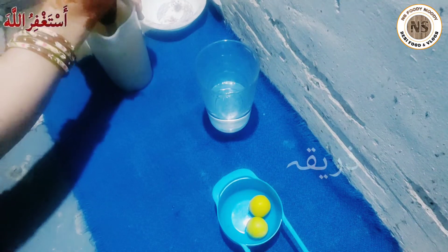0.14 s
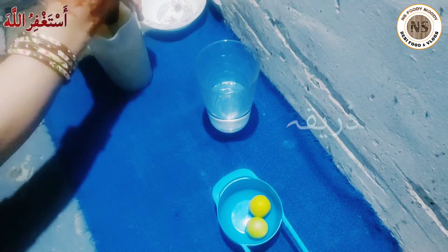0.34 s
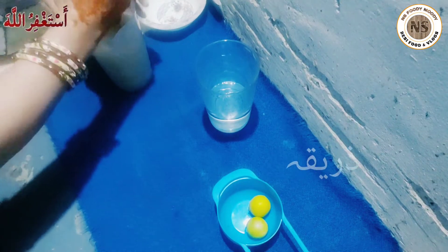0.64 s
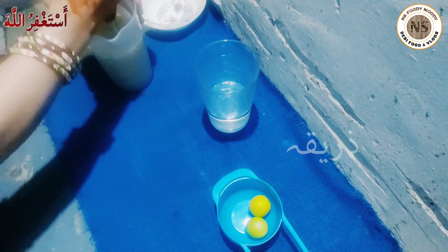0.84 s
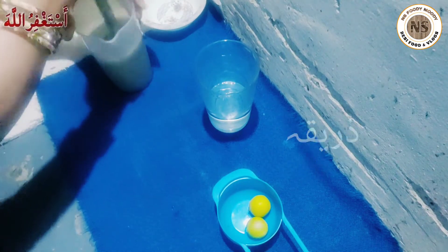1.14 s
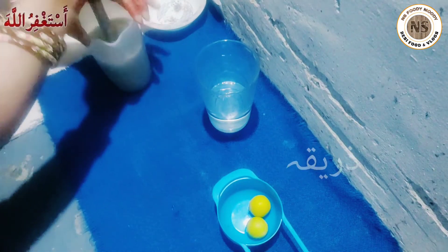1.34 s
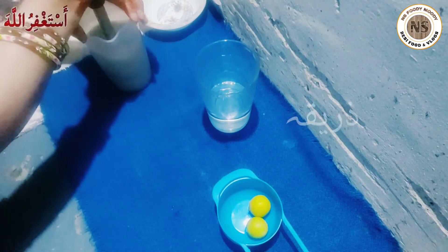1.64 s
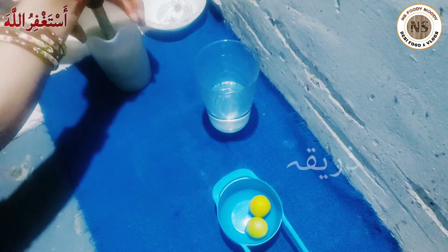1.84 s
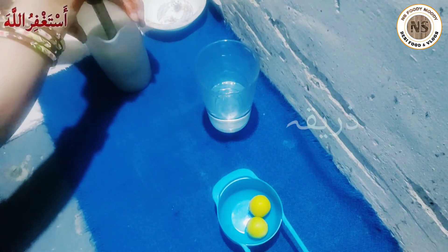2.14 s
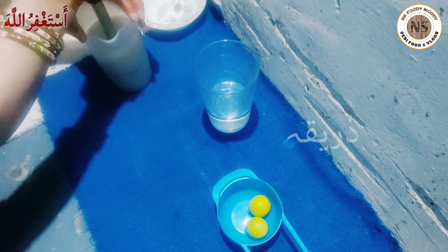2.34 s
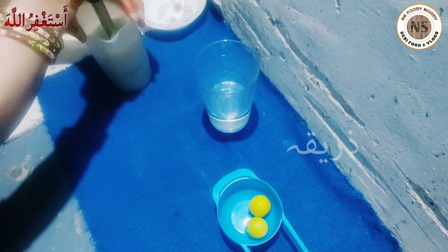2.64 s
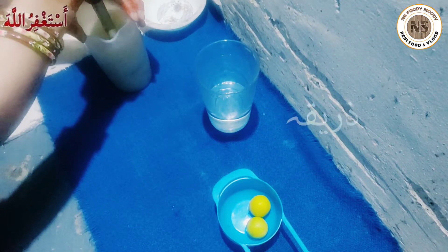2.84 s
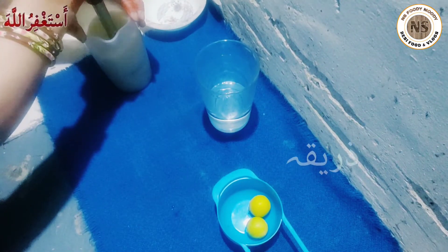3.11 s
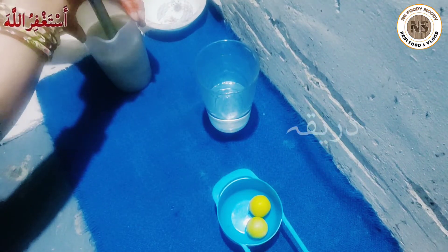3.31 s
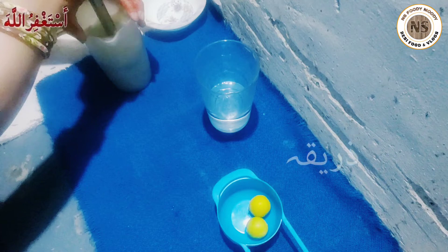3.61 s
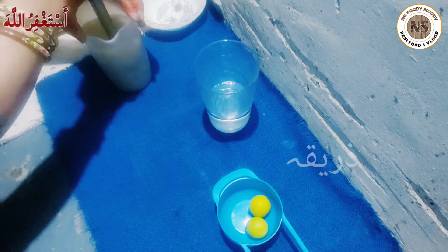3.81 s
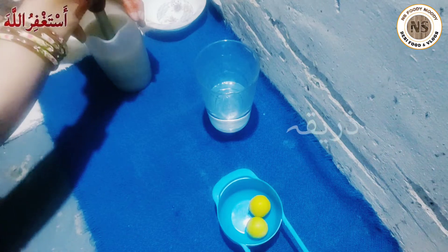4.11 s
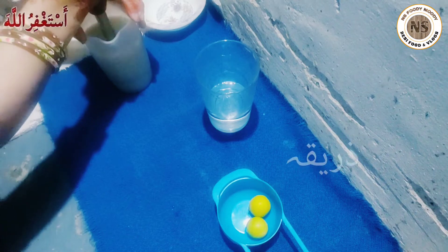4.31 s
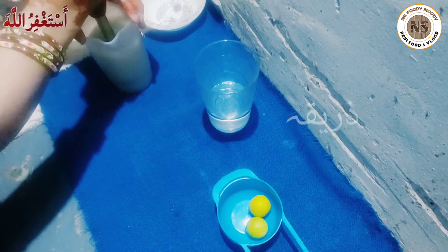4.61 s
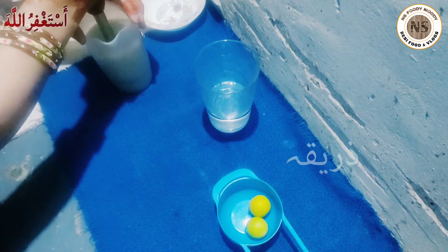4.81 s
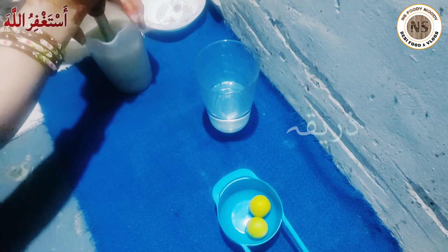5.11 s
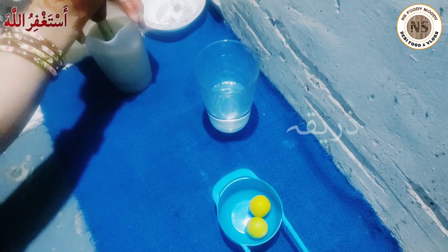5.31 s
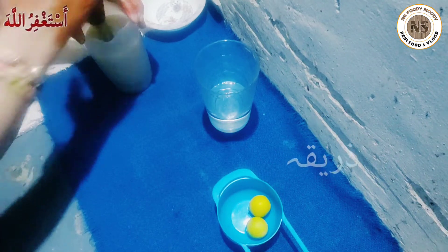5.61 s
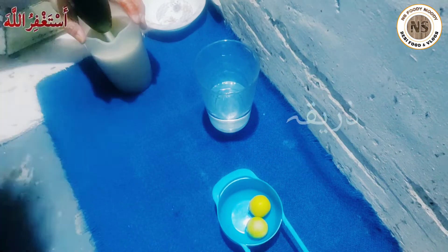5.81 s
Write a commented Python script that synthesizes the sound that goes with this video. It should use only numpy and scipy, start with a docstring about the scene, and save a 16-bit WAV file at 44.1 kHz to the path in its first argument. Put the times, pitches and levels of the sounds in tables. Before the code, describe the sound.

A hand-held stick blender whirs in short repeated bursts in a plastic jug of wet fruit, with knocks and run-downs between presses.

```python
"""A stick blender runs in short bursts in a plastic jug of fruit and water, in a small hard-walled kitchen.
In each press the level builds, holds and runs down: shaft orders make the motor and the booming blade note, which
sags under load, and coloured noise makes the pulp, churned and spat once every turn.
Decaying noise and sines make the wand's knocks on the jug; at the end it is lifted out with a wet smack.
Two microphone ports hear it all, partly alike, with close reflections and a very quiet room."""
import sys
import numpy as np
from scipy import signal
from scipy.fft import rfft, irfft, next_fast_len
from scipy.io import wavfile
from scipy.ndimage import uniform_filter1d

SR = 44100
rng = np.random.default_rng(int(sys.argv[2]) if len(sys.argv) > 2 else 0)


def log_audio(samples):
    """Write samples as a 16-bit WAV file to the path given in sys.argv[1]."""
    # one column per channel
    frames = np.atleast_2d(samples).T
    # limit to full scale, then quantise
    limited = np.clip(frames, -1, 1)
    pcm = np.round(limited * 32767).astype(np.int16)
    wavfile.write(sys.argv[1], SR, pcm)


N = 262395
T = np.arange(N) / SR  # seconds
HZ = np.fft.rfftfreq(N, 1 / SR)


def amp(db):
    """Decibels to gain."""
    return 10 ** (np.asarray(db) / 20)


def read(points, hz=HZ):
    """A table joined by straight lines on a log-frequency axis."""
    f, value = np.transpose(points)
    return np.interp(np.log(hz + 1), np.log(f + 1), value)


def evened(x):
    """Scales a sound so that its middle channel has rms 1."""
    return x / (np.std(np.atleast_2d(x).mean(0)) + 1e-12)


def wobble(hz):
    """Slow chance of rms 1, rolled off above a rate."""
    noise = rfft(rng.standard_normal(N))
    return evened(irfft(noise / np.sqrt(1 + (HZ / hz) ** 4), N))


# Likeness of the two microphone ports. Each row: frequency in Hz, likeness from 0 to 1.
PORT_LIKENESS = [(60, .98), (170, .98), (350, .78), (800, .75), (1300, .55), (2500, .7), (5000, .55),
                 (12000, .35)]
# Phase lead of the left port. Each row: frequency in Hz, lead in radians.
PORT_LEAD = [(60, 0), (180, .08), (400, .9), (800, 1.25), (1030, 1.3), (1380, -.6), (2240, 1.8),
             (2840, 2.3), (3800, 1.6), (6400, 2.4), (13000, 1.4)]
# Balance of the ports. Each row: frequency in Hz, left over right in dB.
PORT_BALANCE = [(60, -1), (99, 1.5), (160, 4), (270, -1.5), (450, 1), (740, -2), (1220, 6), (2010, -1),
                (3330, 3.5), (5500, -3.5), (9080, 4.5), (15000, 2.5)]


def ports(direct, scattered, gain=1):
    """Colours a sound and spreads it over two ports that share only a part of it."""
    left, other = rfft(direct), rfft(scattered)
    same = np.clip(read(PORT_LIKENESS), 0, 1)
    mixed = same * left + np.sqrt(1 - same ** 2) * other
    right = mixed * np.exp(-1j * read(PORT_LEAD)) * amp(-read(PORT_BALANCE))
    return evened(irfft(np.array([left, right]) * gain, N))


# Resonances of the jug and the corner it stands in. Each row: frequency in Hz, width in Hz, peak in dB above the rest.
JUG_MODES = [(89, 6.4, 6), (101, 9.1, 3.5), (125, 2.9, 7.5), (155, 1.6, 1.5), (344.3, 15, 10),
             (399.5, 12, 5.5), (485, 14, 6.5), (580, 48, 4.5), (671.3, 7.1, 9), (763.6, 43, 10.5),
             (830.5, 8.6, 8.5), (874, 22, 5.5), (1020, 8.8, 0.5), (1097, 9.3, 3.5), (1186, 20, 5),
             (1450, 3.3, 5.5), (1760, 12, 7), (2370, 150, 2.5), (3080, 97, -0.5), (5150, 170, 2.5)]


def jug():
    """Gain of the jug's resonances, each a bell on a flat base."""
    return 1 + sum((amp(db) - 1) / (1 + (2 * (HZ - hz) / width) ** 2) for hz, width, db in JUG_MODES)


def hiss(spectrum, gain=1, drive=1):
    """Stereo noise of one colour, pushed by a drive."""
    direct, scattered = drive * rng.standard_normal((2, N))
    return ports(direct, scattered, amp(read(spectrum)) * gain)


def room(x, t60):
    """Diffuse reflections of energy 1, different at each port."""
    t = T[:SR // 2]
    tail = rng.standard_normal((2, len(t))) * amp(-60 * t / t60) * (t > .003)  # first walls after 3 ms
    tail = tail / np.linalg.norm(tail, axis=1)[:, None]
    return signal.fftconvolve(np.atleast_2d(x), tail, axes=1)[:, :N]


def partial(turns, rough):
    """A rotating tone, shaken at random in level and phase."""
    shake = 1 + rough * (wobble(20) + 1j * wobble(21))
    return (shake * np.exp(2j * np.pi * turns)).real * np.sqrt(2 / (1 + 2 * rough ** 2))


def place(x, lead, tilt_db):
    """A tone leads in phase (radians) at the left port, at another level than the right."""
    left = amp(tilt_db) * np.exp(1j * lead)
    right = signal.hilbert(x, next_fast_len(N + SR // 2))[:N] * 2 / abs(left + 1)
    return np.array([left * right, right]).real


def blows(times, levels_db, t60, tail_db, tail_t60):
    """Level of a row of blows: each dies quickly, then lingers in the room."""
    power, t = np.zeros(N + SR), T[:SR // 2]
    decay = amp(-120 * t / t60) + amp(2 * tail_db - 120 * t / tail_t60)
    shape = decay * (1 - np.exp(-t / 0.0021))  # onset in seconds
    for s, db in zip(times, levels_db):
        power[round(s * SR):][:len(t)] += amp(2 * db) * shape
    return np.sqrt(power[:N])


CONTACT_S = 0.0048  # the motor takes up the current in this time
# Button presses. Each row: pressed in seconds, let go in seconds, spin-up in seconds and run-down in dB per second
# (both before a layer's share), then relative levels in dB of churning, spray, sloshing and run-down ring,
# and the blade note's left over right in dB before its sway.
BUTTON = [(-.2, .25, 0.03, 167, -25.5, -40.5, -32, -51, 8),
          (1.442, 1.757, 0.024, 161, -29, -42.5, -31.5, -28.5, 9.5),
          (1.932, 2.185, .014, 164.5, -27.5, -40.5, -31.5, -49, 3),
          (2.308, 3.056, 0.021, 138, -26.5, -41, -31.5, -21, 4),
          (3.384, 3.588, 0.022, 174, -27.5, -42, -34, -31, 4),
          (4.106, 4.565, 0.016, 153.5, -29, -44, -30, -41, 0),
          (4.898, 5.28, 0.022, 163, -27, -40.5, -28.5, -36, 1.5)]


def envelope(levels_db, start_db, rise_share, hang_s, fall_share):
    """Level in dB over all presses: it builds, holds, hangs a moment after release, then falls.
    The shares scale each press's spin-up time and run-down rate for this layer."""
    t, power = T[::40], 1e-14
    for (pressed, let_go, spin_up_s, fall_db_per_s, *_), db in zip(BUTTON, levels_db):
        held_db = np.interp(t, *db) if np.ndim(db) else db
        age, coasting = np.maximum(t - pressed, 0), np.maximum(t - let_go, 0)
        spin_up_db = start_db * np.exp(-age / (rise_share * spin_up_s))
        fall_db = fall_share * fall_db_per_s * (np.hypot(coasting, hang_s) - hang_s)
        contact = np.minimum(age / CONTACT_S, 1)
        power = power + (contact * amp(held_db + spin_up_db - fall_db)) ** 2
    return np.interp(T, t, 10 * np.log10(power))


BLADE_ORDER = 4  # blade notes per turn of the shaft
COAST_S = .45  # the freed shaft slows to 1/e in this time
# Fruit loading the blade, one curve a press. Each row: time in seconds, blade note in Hz before its flutter,
# relative blade note level in dB, relative unbalance hum level in dB.
BLADE_LOAD = [
    [(0.0, 856.1, -22, -32), (0.052, 848.5, -16.5, -48.5), (0.16, 883, -28, -45), (0.192, 873, -26.5, -38),
     (0.212, 876, -31.5, -37.5), (0.28, 857, -27.5, -32.5)],
    [(1.49, 749.2, -42.5, -48), (1.528, 760.3, -11, -34.5), (1.56, 756, -13, -44.5), (1.594, 752, -34, -55),
     (1.618, 747, -22.5, -45), (1.652, 757.6, -16, -50), (1.684, 759.8, -24, -44.5), (1.8, 761, -29, -52.5)],
    [(1.98, 776.3, -34.5, -41), (2.074, 767.6, -18.5, -35), (2.11, 793.3, -17, -51.5),
     (2.162, 782.0, -21.5, -38.5), (2.2, 790, -25, -42)],
    [(2.36, 765.1, -28.5, -42), (2.38, 767, -17, -31), (2.416, 812, -20.5, -47), (2.452, 809.0, -15.5, -32),
     (2.528, 813.7, -28.5, -44.5), (2.57, 803, -14, -43.5), (2.644, 777.3, -22.5, -45.5),
     (2.668, 795.6, -21, -48.5), (2.888, 751.3, -21.5, -36.5), (2.956, 785.5, -33, -36.5),
     (2.98, 761.7, -18, -62), (3.014, 797.7, -25, -29), (3.09, 774.7, -18.5, -36.5)],
    [(3.42, 805.6, -38, -52.5), (3.446, 797.7, -16, -28), (3.514, 798.8, -12.5, -30.5),
     (3.556, 757.5, -22.5, -28), (3.584, 756.4, -18.5, -55.5), (3.61, 756.0, -19, -34)],
    [(4.14, 784.0, -30, -42.5), (4.162, 802.3, -25, -43), (4.19, 804.6, -30.5, -29.5),
     (4.302, 802.2, -22.5, -25.5), (4.496, 807.7, -22.5, -27), (4.526, 800.5, -17.5, -27.5),
     (4.58, 796.6, -23, -27.5)],
    [(4.92, 762, -21.5, -44), (4.942, 781.5, -14, -37), (4.968, 811, -23, -28), (5.05, 750.3, -39.5, -49),
     (5.094, 805.2, -12.5, -67), (5.146, 801.5, -25, -38), (5.24, 750, -29, -30),
     (5.284, 801.8, -20, -32.5), (5.3, 802, -24.5, -43.5)],
]


def shaft():
    """Which press is the latest, the shaft speed under load, and the share of it left after release."""
    pressed, let_go = np.transpose(BUTTON)[:2]
    latest = np.searchsorted(pressed, T) - 1
    note_hz = np.choose(latest, [np.interp(T, *np.transpose(rows)[:2]) for rows in BLADE_LOAD])
    coast = np.exp(-np.maximum(T - let_go[latest], 0) / COAST_S)
    return latest, note_hz / BLADE_ORDER, coast


# Whine of the higher shaft orders. Each row: multiple of the shaft speed, relative level in dB.
WHINE_ORDERS = [(2, -8), (4, -10), (5, -10), (6, -14), (7, -17.5), (8, -21.5), (9, -23), (12, -20),
                (16, -21), (26, -24.5)]
# Ring of the jug's air column. Each row: frequency in Hz, density in dB per Hz before the jug's resonances.
AIR_COLUMN = [(450, -41.5), (560, -12.5), (670, 4), (760, -9.5), (850, -4.5), (1000, -32.5)]


def motor(coast, speed, blade_db, hum_db, third_db, churn_db, sway_db):
    """The blade note is the fourth shaft order; after each release the whine slides down and the jug rings on."""
    held = np.cumsum(speed * (1 + .002 * wobble(18))) / SR
    turns = np.cumsum(speed * coast * (1 + 0.0042 * wobble(25.07))) / SR
    driven = coast ** 3  # the blade note gives way to free ringing
    blade = amp(blade_db - 0.05) * np.sqrt(driven) * partial(BLADE_ORDER * held, rough=0.15)
    ringing = amp(blade_db) * np.sqrt(1 - driven) * hiss(AIR_COLUMN, jug() ** 2)
    hum = amp(hum_db - 0.7 - 32 * (1 - coast)) * partial(turns, 0.19 + 4.5 * (1 - coast))
    third = amp(third_db + 1.3 - 4.4 * (1.5 - coast)) * partial(3 * held, rough=0.64)
    orders = sum(amp(db) * partial(order * turns, rough=1.0) for order, db in WHINE_ORDERS)
    whine = amp(churn_db - 3.5 - 12 * (1 - coast)) * irfft(rfft(orders) * jug(), N)
    echo = room(blade + third + whine, t60=.35)[0] * np.array([[1], [-1]])  # walls widen the tones
    direct = place(blade + third, lead=1.22, tilt_db=sway_db) + place(whine, lead=0.5, tilt_db=9.0)
    return direct + hum + ringing + amp(-14) * echo


# Colours of the pulp before the jug's resonances: low slosh, churning, bright spray.
# Each row: frequency in Hz, density in dB per Hz.
SLOSH_COLOUR = [(20, -48), (60, -39.5), (125, -16), (165, -8.5), (260, -1), (360, 0.5), (440, -2),
                (540, -2.5), (700, 3), (900, -9), (1100, -22), (2000, -53)]
CHURN_COLOUR = [(400, -31.5), (700, -5), (950, -0.5), (1300, -4), (1750, -11), (2650, -7.5), (2950, -11),
                (4000, -17), (5000, -26), (8000, -51)]
SPRAY_COLOUR = [(2500, -31.5), (4000, -2), (4700, -6.5), (5300, -2), (5900, -5), (6800, -5.5),
                (7700, -15.5), (8600, -12), (9700, -6), (10600, -9), (15800, -11.5)]
# Low thud, lent to the gurgle and played by the knocks too. Each row: frequency in Hz, density in dB per Hz.
THUD_COLOUR = [(25, -36), (60, -21.5), (90, -8.5), (130, 2), (230, -8), (330, -5.5), (600, -24.5),
               (1500, -55)]


def pulp(coast, speed, churn_db, spray_db, slosh_db):
    """Every turn throws pulp at the wall; bubbles collapse and bits of fruit crack on the blade."""
    turns = np.cumsum(speed * coast * (1 + 0.023 * wobble(60))) / SR
    throw = amp(1.6 * np.cos(2 * np.pi * turns) + 1.9 * wobble(55))
    struck = rng.random(N) < 70 / SR  # 70 cracks a second on average
    cracks = struck * np.minimum(rng.exponential(1, N), 4) ** 2
    crackle = signal.lfilter([1], [1, -np.exp(-1 / (0.00071 * SR))], cracks)  # each falls to 1/e in 0.71 ms
    drive = throw * np.sqrt(1 + 1.3 * crackle)
    ring = jug()
    slosh = amp(slosh_db + 2.0) * hiss(SLOSH_COLOUR, ring, drive)
    # the vortex falls in as the blade slows
    gurgle = amp(slosh_db - 5.0) * np.sqrt(1 - coast) * hiss(THUD_COLOUR, ring)
    churn = amp(churn_db) * hiss(CHURN_COLOUR, ring, drive)
    spray = amp(spray_db - 1.5) * hiss(SPRAY_COLOUR, ring, drive)
    fizz = amp(-4.0) * room(churn + spray, t60=0.17)  # close walls colour the fizz
    wet = slosh + gurgle + churn + spray + fizz
    return wet + amp(-21) * room(wet, t60=0.31)


# The shaken table. Each row: frequency in Hz, density in dB per Hz before the jug's resonances.
TABLE_COLOUR = [(20, -24.5), (45, -27), (65, -18.5), (85, 4.5), (105, -5), (135, -10.5), (200, -29),
                (400, -60)]


def rumble():
    """The jug shakes the table: a low noise that follows the presses and wavers."""
    held_db = np.full(len(BUTTON), -50.5)
    level_db = envelope(held_db, start_db=-19.5, rise_share=0.98, hang_s=0.2, fall_share=1.3) + 1.8 * wobble(8.6)
    return amp(level_db) * hiss(TABLE_COLOUR, jug())


FLOOR_DB = -81.5
# The very quiet room. Each row: frequency in Hz, density in dB per Hz before the floor level.
FLOOR_COLOUR = [(18, -39.5), (30, -7), (119, -2), (497, -15.5), (794, -8.5), (3500, -22), (6530, -10.5),
                (8690, -21), (15000, -22.5)]


def room_tone():
    """Steady faint noise under everything."""
    return amp(FLOOR_DB) * hiss(FLOOR_COLOUR)


def swells(rows):
    """Short rounded lifts of level, in dB."""
    return sum(db * np.exp(-((T - s) / length) ** 2) for s, length, db in rows)


# Fruit meeting the blade. Each row: time in seconds, half-length to 1/e in seconds, lift of the churning in dB.
FRUIT_CHUNKS = [(0.143, .025, 2), (0.223, 0.051, 1), (1.5, 0.029, 4.5), (1.696, 0.01, 3), (2.062, .015, 3),
                (2.475, 0.03, 2.5), (2.972, 0.017, 5.5), (3.045, 0.059, 2.5), (3.435, 0.022, 2.5),
                (3.567, .015, 3), (5.012, 0.027, 2), (5.245, 0.037, 2)]


def surges():
    """A piece of fruit meets the blade and the churning surges."""
    return swells(FRUIT_CHUNKS)


# Jug resonances the falling note sweeps through. Each row: frequency in Hz, width in Hz, level in dB.
SWEPT_MODES = [(585.6, 12, -5.5), (667.2, 14, 1)]


def run_down(coast, speed, ring_db):
    """The falling blade note sets the jug's lower resonances ringing one after another."""
    slowing = np.interp(coast, [.62, .74, .95, 1], [0, 1, 1, 0])
    turns = np.cumsum(speed * coast) / SR
    note = amp(ring_db) * slowing * partial(BLADE_ORDER * turns, rough=1.3)
    rung = sum(amp(db) * signal.lfilter(*signal.iirpeak(hz, hz / width, SR), note) for hz, width, db in SWEPT_MODES)
    return place(rung, lead=0.66, tilt_db=-0.5)


# The wand on the jug. Each row: time in seconds, thud pitch in Hz, relative levels in dB of thud, body and clack.
WAND_KNOCKS = [(0.439, 275, -54, -40.5, -52), (0.472, 263.5, -60.5, -41, -48.5),
               (0.504, 192.8, -61.5, -59, -75), (0.761, 100, -75, -83, -73.5),
               (0.862, 299, -67, -59.5, -61), (0.874, 266, -67, -56, -62), (1.19, 239, -60, -60, -60),
               (1.223, 240, -60, -61, -66), (1.371, 277, -73.5, -69, -73), (1.395, 275, -73.5, -75, -80),
               (1.444, 269, -37, -56.5, -43), (3.569, 208, -50.5, -34, -25), (3.592, 189, -55, -38, -36.5),
               (3.848, 107.4, -71.5, -79, -62), (4.057, 190.7, -56, -56, -73),
               (4.106, 221.6, -45, -54, -51), (4.741, 200, -67, -65, -52.5),
               (5.743, 178, -42, -46.5, -51.5), (5.766, 150, -39.5, -46, -54),
               (5.793, 121, -36, -46.5, -64)]
# Colours of the jug's body and the plastic clack. Each row: frequency in Hz, density in dB per Hz before the jug.
BODY_COLOUR = [(150, -34.5), (400, -11.5), (560, 0.5), (660, -1.5), (800, 8), (920, 3.5), (1100, 3.5),
               (1350, -2), (1800, -10.5), (5000, -49)]
CLACK_COLOUR = [(900, -39), (1900, -18), (2450, 6.5), (2950, 1.5), (3500, 6.5), (4300, -8), (5300, -7.5),
                (6800, -11), (7800, -18), (15000, -22)]


def knocks():
    """The wand bumps the jug: a pitched thud on the table, the jug's ring and a plastic clack."""
    s, thud_hz, thud_db, body_db, clack_db = np.transpose(WAND_KNOCKS)
    thud = hiss(THUD_COLOUR) * blows(s, thud_db - 1.5, t60=0.11, tail_db=-5.0, tail_t60=0.31)
    for at, hz, db in zip(s, thud_hz, thud_db):
        age = np.maximum(T - at, 0)
        level = amp(db - 1.5 - 0.85 * hz * age)  # same loss in every cycle
        thud = thud + level * np.sin(2 * np.pi * hz * age)
    body = hiss(BODY_COLOUR, jug()) * blows(s, body_db + .5, t60=0.16, tail_db=-5.5, tail_t60=0.3)
    clack = hiss(CLACK_COLOUR, jug()) * blows(s, clack_db - 1.0, t60=0.041, tail_db=-2.5, tail_t60=0.21)
    return thud + body + clack


# Juice falling back. Each row: time in seconds, half-length to 1/e in seconds, lift of the spray in dB.
FALLING_JUICE = [(.47, 0.037, 14), (1.86, .03, 6), (3.228, 0.029, 17.5), (3.708, .026, 12.5),
                 (4.72, .04, 4.5), (5.47, 0.036, 8)]


def splashes():
    """Juice falls back as the shaft slows and the spray swells."""
    return swells(FALLING_JUICE)


# Juice spits and smacks. Each row: time in seconds, level in dB.
JUICE_SPITS = [(0.9002, -57), (1.6906, -39), (2.6328, -34), (2.6942, -46), (3.5765, -50.5), (4.2632, -30),
               (5.801, -42.5), (5.813, -37.5)]
# Their colour. Each row: frequency in Hz, density in dB per Hz.
SPIT_COLOUR = [(1500, -16), (3200, -3), (3900, -18), (5200, -1.5), (6700, -1.5), (7700, -21.5), (8800, 6),
               (10500, -13), (13000, 3), (16000, -8)]


def spits():
    """Bright wet smacks of juice: noise that dies in an instant and lingers in the room."""
    s, treble_db = np.transpose(JUICE_SPITS)
    return hiss(SPIT_COLOUR) * blows(s, treble_db, t60=0.024, tail_db=-14.0, tail_t60=0.33)


# The wand sliding through the pulp. Each row: start in seconds, end in seconds, level in dB.
WAND_SLIDES = [(1.174, 1.196, -73), (1.29, 1.444, -69), (5.58, 5.712, -77), (5.717, 5.76, -61)]
# Their colour. Each row: frequency in Hz, density in dB per Hz.
SCRAPE_COLOUR = [(400, -25), (680, -7.5), (800, 8), (1000, -11), (1900, -27), (2450, -5), (3000, -28),
                 (5500, -17), (8000, -32)]


def slide():
    """A faint scrape of noise, coloured by the ringing jug."""
    level = sum(amp(db) * ((T > start) & (T < end)) for start, end, db in WAND_SLIDES)
    return uniform_filter1d(level, size=600) * hiss(SCRAPE_COLOUR)


# The button snapping as it is pressed. Each row: time in seconds, relative level in dB.
BUTTON_SNAPS = [(1.4441, -34.5), (1.9475, -22), (3.3853, -31)]
# Their colour. Each row: frequency in Hz, density in dB per Hz.
SNAP_COLOUR = [(800, -6.5), (2500, 5), (5300, -2), (7700, -10), (9500, -9), (15800, -12.5)]


def switch():
    """A short bright snap of noise near the start of three of the presses."""
    s, snap_db = np.transpose(BUTTON_SNAPS)
    return hiss(SNAP_COLOUR) * blows(s, snap_db - 4, t60=0.026, tail_db=-8, tail_t60=.2)


SQUEAK_S, SQUEAK_HZ, SQUEAK_DB = 3.772, 2288, -50.5


def squeak():
    """A brief thin rasp from the bearing of the slowing shaft: a roughened tone."""
    swell = np.exp(-((T - SQUEAK_S) / 0.018) ** 2)
    rasp = amp(SQUEAK_DB) * swell * partial(SQUEAK_HZ * T, rough=1.2)
    return place(rasp, lead=1.14, tilt_db=4)


def scene():
    """Motor, pulp and handling over a very quiet room."""
    *_, churn, spray, slosh, ring, sides = np.transpose(BUTTON)
    curves = [np.transpose(rows) for rows in BLADE_LOAD]
    blade = [(s, db) for s, _, db, _ in curves]
    hum = [(s, db) for s, _, _, db in curves]
    latest, speed, coast = shaft()
    surge_db, splash_db = surges(), splashes()
    blade_db = envelope(blade, start_db=-31, rise_share=0.86, hang_s=0.0066, fall_share=0.92)
    hum_db = envelope(hum, start_db=-23.5, rise_share=0.78, hang_s=0.1, fall_share=0.56)
    # the third order grows with the unbalance
    third_db = envelope(hum, start_db=-9.5, rise_share=.9, hang_s=.012, fall_share=1.2)
    churn_db = envelope(churn, start_db=-19.5, rise_share=1.0, hang_s=0.0065, fall_share=0.94)
    churn_db = churn_db + surge_db + 0.27 * splash_db
    spray_db = envelope(spray, start_db=-15.5, rise_share=1.0, hang_s=0.0099, fall_share=1.0)
    spray_db = spray_db + 0.8 * surge_db + splash_db
    slosh_db = envelope(slosh, start_db=-24, rise_share=0.52, hang_s=.04, fall_share=0.91) + .9 * surge_db
    sway_db = sides[latest] + 1.2 * wobble(6)  # the standing wave shifts as the wand moves
    blender = motor(coast, speed, blade_db, hum_db, third_db, churn_db, sway_db)
    blender = blender + run_down(coast, speed, ring[latest])
    wet = pulp(coast, speed, churn_db, spray_db, slosh_db)
    handling = knocks() + spits() + slide() + switch() + squeak()
    return blender + wet + rumble() + room_tone() + handling


EDGE_HZ = 15950


def record(dry):
    """The recorder's band limit: a steep low-pass."""
    low_pass = signal.firwin(801, EDGE_HZ, window=("kaiser", 9), fs=SR)
    return signal.oaconvolve(dry, low_pass[None], "same")


dry = scene()
out = record(dry)
log_audio(out)
```